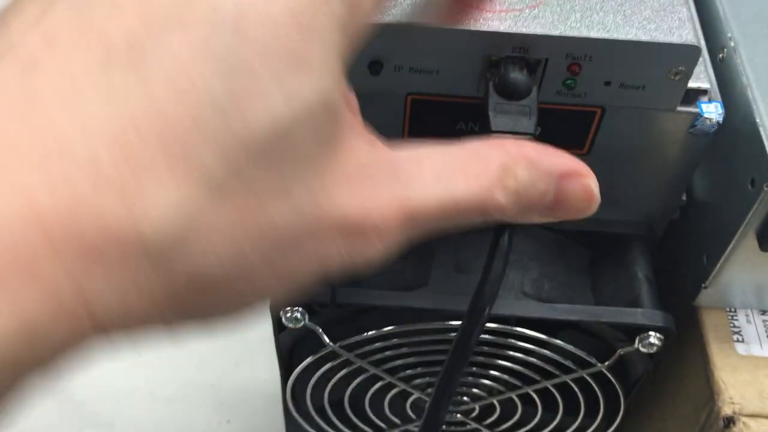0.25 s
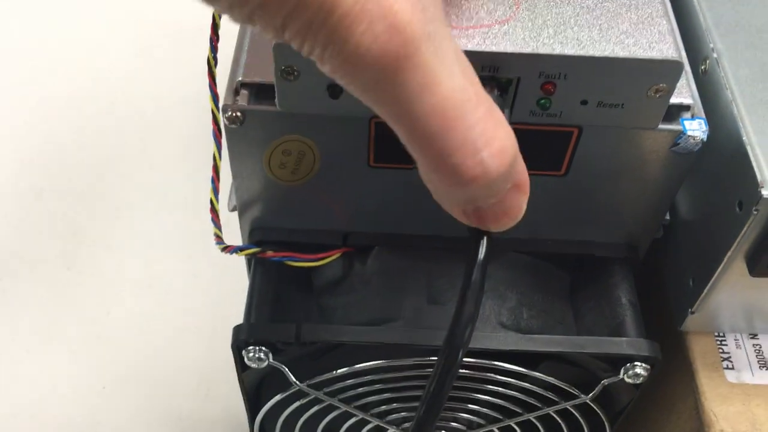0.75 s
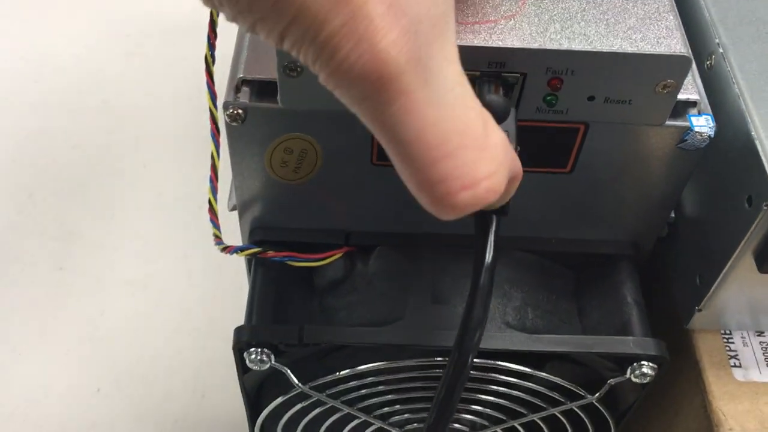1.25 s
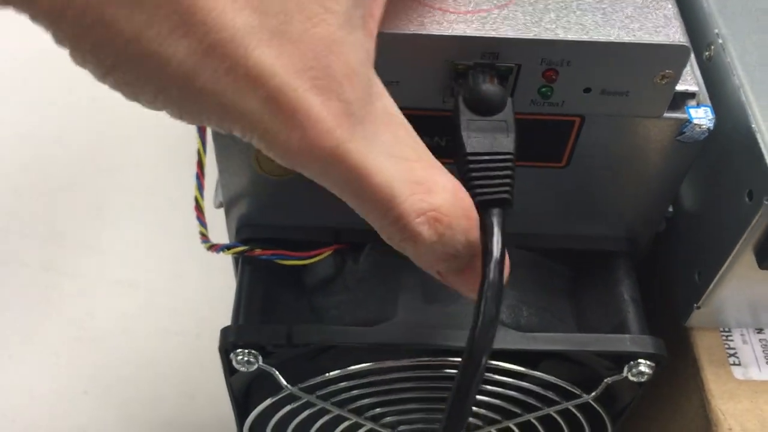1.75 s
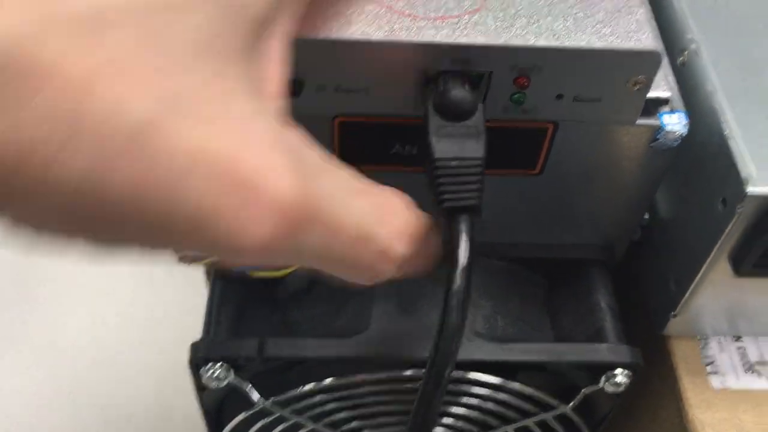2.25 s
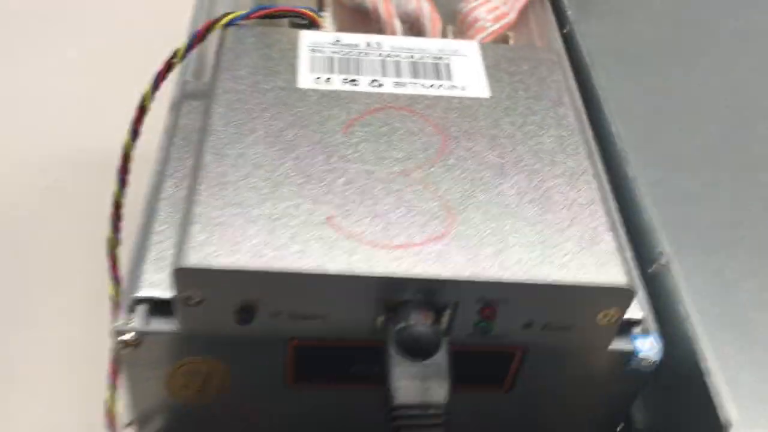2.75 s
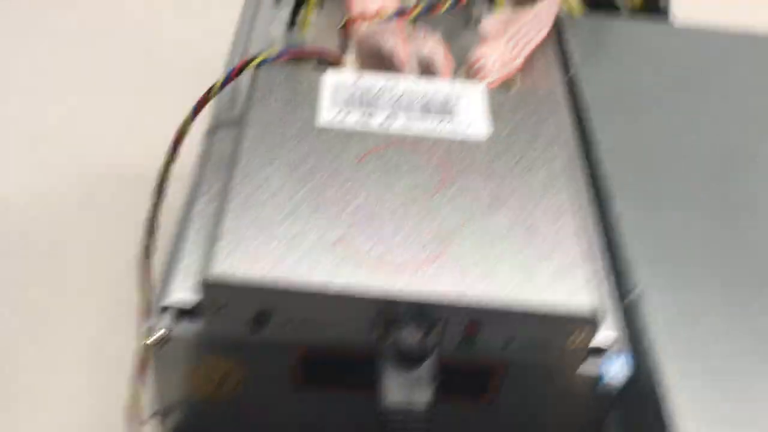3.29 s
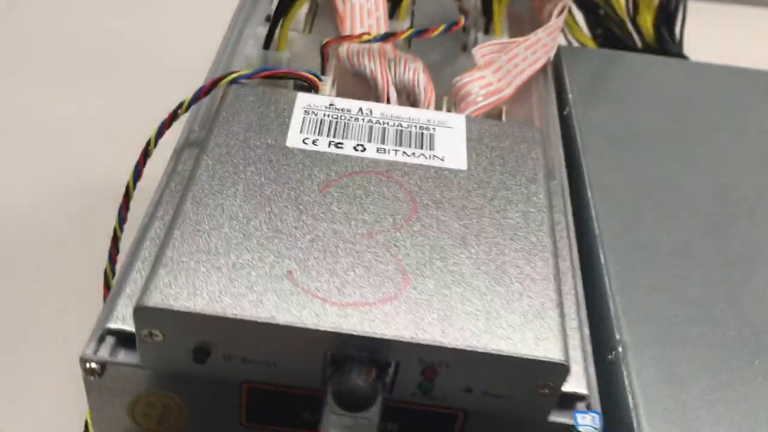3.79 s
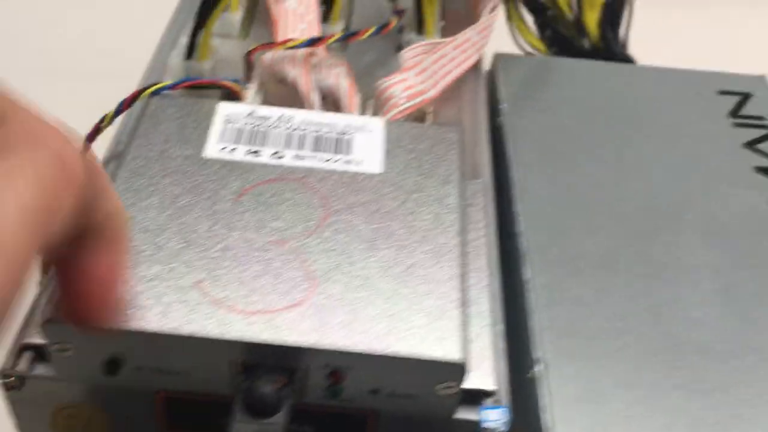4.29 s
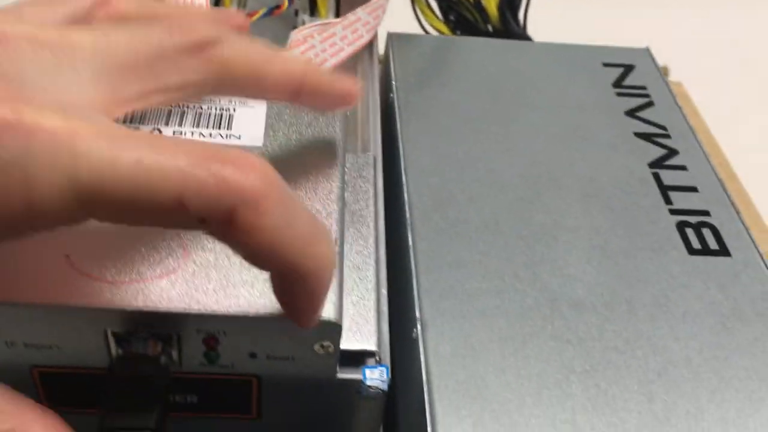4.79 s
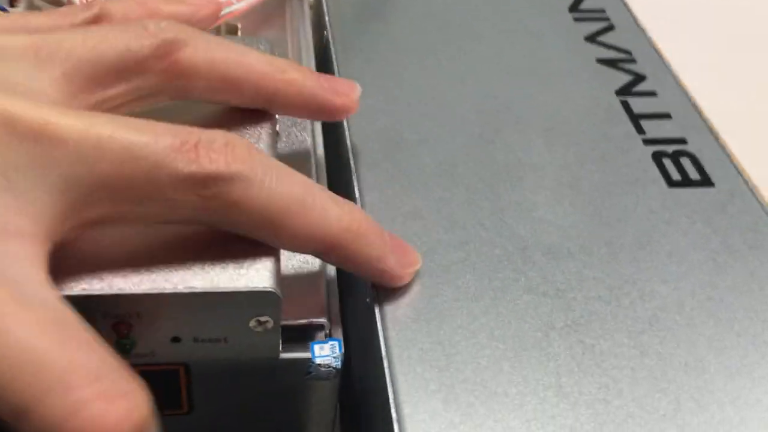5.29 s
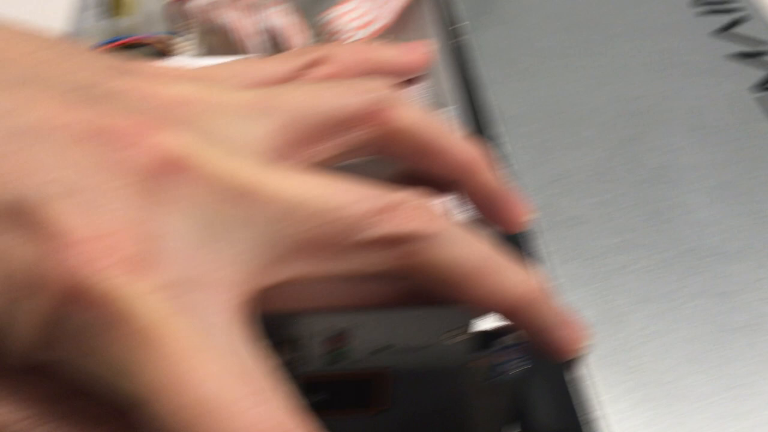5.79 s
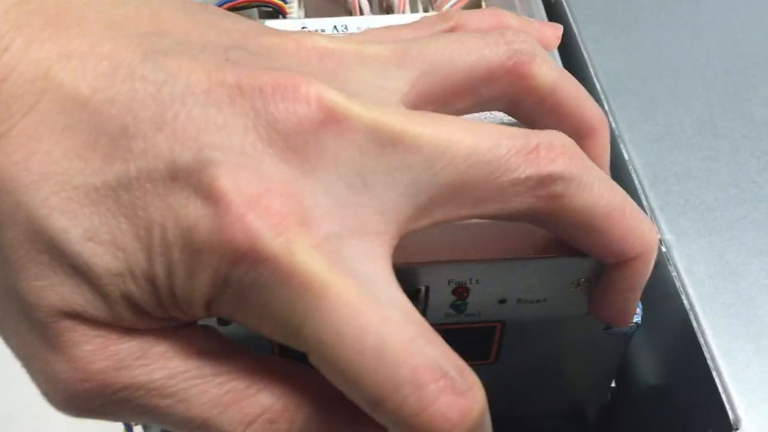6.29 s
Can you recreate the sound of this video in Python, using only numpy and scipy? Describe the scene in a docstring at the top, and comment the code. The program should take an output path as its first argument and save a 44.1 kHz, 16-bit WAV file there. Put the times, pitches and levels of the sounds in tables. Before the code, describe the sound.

A hand fumbles at a small metal device, with faint pads and grainy skin scrapes, then a loud crisp latch snap as a cable plug seats. A few softer knocks follow, then a quiet stretch with soft sleeve rustle. Later a flurry of hard metallic taps bursts out, then one final sharp nail-like crack. Close handheld microphone in a small room, short reverberation, faint low machinery hum and light hiss.

```python
"""A small room in a building: a hand pushes a network plug into the port of a small metal casing. It also taps,
grips and rubs the casing. Latch, finger pads, thumbs, knuckles, a flicked cable and nails make short noise
cracks that set the casing ringing. Skin and cable scrape as grainy noise played through the casing; a sleeve
rustles as soft noise. The room answers with fading noise over a low machinery hum of noise and wavering tones.
Dull bumps reach the phone through the hand, and its microphone adds hiss."""
import sys
import numpy as np
from scipy import signal
from scipy.fft import rfft, irfft, next_fast_len
from scipy.io import wavfile
from scipy.ndimage import uniform_filter1d, map_coordinates

SR = 44100
rng = np.random.default_rng(int(sys.argv[2]) if len(sys.argv) > 2 else 0)


def dump_mix(stems):
    """Bounce the given channels to the path in sys.argv[1] as a 16-bit WAV at rate SR."""
    frames = np.atleast_2d(stems).T  # one column per channel
    limited = np.clip(frames, -1, 1)  # hard clip at full scale
    pcm = np.round(limited * 32767).astype(np.int16)
    wavfile.write(sys.argv[1], SR, pcm)


N = 288414  # length in samples

# Touches on the casing, one table for each kind of striker (KNOCKS holds knuckle knocks and, at 1.956 s, a
# cable # flicking against the casing): start_s, peak_db (of the direct sound), knock_hz, # extra_knock_db,
# brightness_db_per_octave, casing_ring_db, room_db
LATCH = [(1.324, -3.5, 938.7, 1, -0.24, 3.5, -14)]
PADS = [(.185, -44.5, 1080, -3, 2.5, 9.9, -9), (.263, -40.5, 686, -8, 1.5, 7.4, -3),
        (.336, -32.5, 1180, 2, -1.2, 2.7, -14), (.447, -26, 1250, 4, .9, 5.4, -7),
        (.69, -54, 1060, 5, -.3, 7.3, 13), (.739, -36, 770, -3, -1.7, 12, -11),
        (.869, -41.5, 720, 8, -7, .3, -9), (1.015, -35.5, 735, -9.5, -8, 7, 3),
        (1.13, -45, 720, 2, -3.5, 2.8, -22), (1.618, -41.5, 926, -2.5, 1, 6, -4),
        (4.644, -39.5, 1150, -8, -0.7, 10, 7), (4.821, -28.5, 1080, 2, 0, 17, -21),
        (4.837, -34.5, 1070, -3, 0, 8, -4), (4.899, -20.5, 1030, 8.5, 1.4, 3.8, -8.5)]
THUMBS = [(1.859, -40, 890, 3, -.6, 4, -7), (2.143, -31, 990, -4, .6, 1.5, -7),
          (3.426, -39, 930, -3, -0.22, .3, -4.5), (5.2, -33, 1100, 1.5, 0.8, 4.4, -9)]
KNOCKS = [(.392, -41, 1180, 5, 0.1, 11, -12), (.478, -31, 1230, 9, -2.5, -9, -15),
          (.565, -42, 1090, 8, .3, -9, 0), (.785, -47, 1020, 6, -1.7, 1.5, 1),
          (1.956, -14, 980, 0.5, -0.7, 7.5, -10.5), (2.303, -34.5, 1010, -7, -2.5, 1.5, -8),
          (4.305, -41.5, 710, -2.5, -4.5, 5.5, 5), (4.611, -49, 1032, 3, -0.5, 8, -7),
          (4.679, -12.5, 1192, 7.5, 0.94, 8.5, -13.5), (4.874, -35, 1110, -5, -3.5, 9, 1),
          (4.925, -22.5, 1180, 14, 1, 8.5, -14), (4.943, -8, 1240, -16, 3, 5.5, -13.5)]
NAILS = [(.924, -50, 746, -1, -7.5, 0, .3), (2.082, -46, 780, 5, -1, -3, -17),
         (3.515, -46.5, 1100, 0, -5, 1, -7), (3.611, -47.5, 770, 1, -16.5, -13, -7),
         (3.781, -29, 1100, 6.8, 2, 8, -19), (5.291, -26, 1060, -4, -0.1, -8, -13),
         (6.037, -46.5, 1310, 1.5, -2, 3, -10.5), (6.255, -45, 1180, 1, 2, 6.5, -13),
         (6.325, -47, 1250, -1, -3.5, 12, -14), (6.345, -28, 1050, -5, -1.3, -1, -13),
         (6.371, -23, 1300, 4, -0.5, 4, -18), (6.387, -4, 1420, 7, 0.6, -1, -10.5)]
# The strikers: touches (a table above), colour_db (list: thud, knock, clack, snap, tick, hiss, sizzle),
# contact_ms (0.1 ms is added to it), hand_damping (times faster that the casing fades)
STRIKERS = [(LATCH, [2.5, -0.14, -6, 9, -3, 1.5, -0.3], 2.1, 1.3),
            (PADS, [9, 13, -4, -7, -10.5, -14.5, -11.5], 1.5, 1.4),
            (THUMBS, [16, 15, 6.5, 3.5, -5, -21, -26], 1.28, 1.03),
            (KNOCKS, [5.5, 6, 3.5, 0.5, 1, -2.5, -5], 1.399, 1.27),
            (NAILS, [-4, -12, -4.5, -5, -8.5, 4.5, 3.5], 0.99, 1.1)]
# Centres of a touch's thud, clack, snap, tick, hiss and sizzle: centre_hz
TOUCH_PARTS_HZ = [400, 2200, 3000, 4600, 9000, 14000]
# Ringing modes of the casing: pitch_hz, level_db (relative), t60_s (60 dB fade time before hand damping)
CASING_MODES = [(259, -1.5, 0.12), (375.3, 4.5, 0.18), (730, 5, 0.2), (774, -2, 1), (897, 0.5, 0.025),
                (1082, 4.5, 0.032), (1215, 5, 0.089), (1502, -2, 0.36), (1823, -5.5, 0.297),
                (2344, 7, 0.11), (2963, 6, 0.058), (3580, 3.5, 0.11), (4080, 1.5, 0.16), (4200, 3, 0.45),
                (4356, 2.5, 0.07), (4590, 0.5, .6), (5195, 1, 0.4), (5550, 5, 0.076), (6060, -0.5, .05),
                (6890, 4, .12), (7480, -2, 0.045), (8200, 0, 0.084), (8840, -1.5, 0.06),
                (10740, -0.5, 0.027), (12300, -6.5, 0.034), (13400, -4, 0.028), (15200, 3, 0.045)]
# Strokes of skin and cable: start_s, attack_s, hold_s, release_s, sizzle_db (before the casing),
# then levels relative to the sizzle: knock_db, scrape_db, squeak_db
STROKES = [(0.0, 0.033, .02, .02, -67, 4.5, -4, -21), (0.169, 0.025, .005, 0.05, -56.5, 4, -10, -7),
           (0.269, 0.028, 0.041, .01, -58, 1, -11, 15), (0.324, 0.019, 0.011, 0.024, -47.5, -9, -13, 5),
           (0.427, 0.018, 0.045, 0.011, -38, -2.5, -4, -1),
           (0.551, 0.019, 0.0027, 0.016, -48.5, -11, -3.5, -21),
           (0.583, 0.025, 0.045, .02, -74, 13.5, 4, -10), (0.668, 0.016, .1, 0.054, -60, 3.5, -6, 1),
           (0.838, 0.026, .01, 0.034, -62.5, 5, -5, -9), (1.004, 0.014, 0.006, .03, -63.5, 14, -0.5, -14),
           (1.102, 0.036, .003, 0.01, -79.5, 17.5, 5, -18), (1.284, 0.027, 0.013, .003, -66, 18, 2.5, -2.5),
           (1.568, 0.032, 0.041, .05, -52, -12, -10.5, -7), (2.282, 0.031, .015, .03, -48.5, 0.5, -3.5, 4),
           (4.294, 0.028, 0.033, .02, -46.5, -8, -7, 11), (4.349, .016, 0.0075, 0.024, -35, -14.5, -13, 18),
           (4.364, .018, 0.0072, 0.039, -44.5, -6, 1.5, -6), (4.61, 0.058, 0.016, .003, -56, -6, -2, -14.5),
           (4.696, .005, .01, 0.033, -60.5, 19.5, 0, -11), (4.727, .023, 0.0038, .025, -46.5, 4.5, -2, -1),
           (4.805, 0.017, .003, 0.052, -44, -12, -9, -1), (5.003, 0.037, 0.11, .003, -59, -3.5, -2.5, 1.5),
           (5.271, 0.072, 0.16, 0.12, -55, -3.5, -7.5, 4), (5.521, 0.087, .012, 0.034, -48, -7.5, -5.5, -1),
           (5.63, 0.022, 0.049, 0.013, -66, -8, -2, -7.5), (5.916, 0.048, 0.051, .02, -68, 0.5, 1.5, -12),
           (6.017, 0.017, 0.0027, .03, -59.5, 5.5, 4.5, -16),
           (6.239, 0.0074, 0.0088, 0.022, -51, -5.5, -5, -26)]
# Centres of a stroke's knock, scrape, sizzle and squeak: centre_hz
STROKE_PARTS_HZ = [1150, 4000, 12300, 15300]
# Rustles of sleeve and arm, away from the casing: start_s, attack_s, hold_s, release_s, swish_db, air_db
RUSTLES = [(1.36, .05, 0.32, .015, -67, -63.5), (3.27, .04, .015, .04, -74, -64),
           (3.37, 0.042, 0.16, 0.027, -68.5, -67.5), (3.59, 0.017, 0.035, .09, -60, -62),
           (3.81, .11, .1, .1, -59, -63), (4.11, 0.027, 0.021, .02, -80, -68),
           (4.17, 0.028, 0.016, .025, -78, -61.5)]
# Colour of the cloth's broad swish: frequency_hz, relative_level_db (per Hz)
SWISH_COLOUR = [(300, -39.5), (600, -5), (1200, 0.5), (2300, -3), (4500, -8), (8000, -17.5), (16000, -30)]
# Colour of the cloth's high airy part: frequency_hz, relative_level_db (per Hz)
AIR_COLOUR = [(3000, -30.5), (6000, -11.5), (9500, -6), (12000, -0.5), (16000, -1.5)]
# Dull bumps through the hand into the phone: centre_s, pitch_hz, level_db, length_s
BUMPS = [(0.665, 60.5, -45.5, 0.13), (1.088, 63.4, -38, 0.076), (3.581, 58.2, -48, 0.13),
         (3.957, 103.5, -43.5, 0.18), (4.022, 113.8, -49, 0.14), (4.897, 59.6, -46.5, 0.11),
         (5.453, 126.5, -42, 0.054)]
# How fast the room fades: frequency_hz, t60_s (60 dB fade time of the nearer tail)
ROOM_FADE = [(300, 0.55), (1000, 0.35), (4000, .26), (8000, 0.24), (14000, 0.12)]
# Slow level changes of the machinery noise: time_s, level_db
HUM_LEVEL = [(0.0, 0.5), (2.3, -0.5), (2.8, -2), (4.0, 0.5), (5.3, 1), (6.54, -2)]
# Colour of the machinery's rumble: frequency_hz, relative_level_db (per Hz)
RUMBLE_COLOUR = [(15, -50.5), (28, -24.5), (40, -3), (60, -1.5), (80, -2.5), (95, -10.5), (120, -49)]
# Colour of the machinery's drone: frequency_hz, relative_level_db (per Hz)
DRONE_COLOUR = [(70, -52.5), (95, -8), (122, 6), (140, 3.5), (165, -3), (190, -14), (250, -48)]
# Colour of the rushing air: frequency_hz, relative_level_db (per Hz)
RUSH_COLOUR = [(94, -52), (160, -12.5), (212, -4.5), (299, -11), (318, -13.5), (364, -14), (465, -22),
               (501, -20), (689, -25.5), (859, -26.5), (1210, -29), (1400, -34), (3000, -39.5), (3900, -65),
               (6600, -120)]
# Motor and mains tones: pitch_hz, relative_level_db
TONES = [(43, -60), (60, -54.5), (120, -56)]
# Colour of the microphone hiss: frequency_hz, relative_level_db (per Hz)
HISS_COLOUR = [(1200, -41.5), (2500, -3.5), (3800, 2), (4900, -11.5), (6200, -3), (8000, -18),
               (10300, -18.5), (11500, -4.5), (13500, 0.5), (16000, -1)]

SWELL_DB = 24.5  # a stroke or rustle starts and ends this far under its hold
RUMBLE_DB, DRONE_DB, RUSH_DB, HISS_DB = -54.5, -51.5, -54, -75
TOP_HZ = 15850  # middle of the 300 Hz wide slope at the top of the band


def contacts():
    """Each touch is a short rough crack coloured by what strikes; casing and room ring on."""
    size = 2 ** 14
    out = np.zeros(N + size)
    t = np.arange(size) / SR
    hz = np.fft.rfftfreq(size, 1 / SR)
    for touches, colour_db, contact_ms, damping in STRIKERS:
        contact_s = contact_ms * 1e-3 + 1e-4
        blow = np.exp(-2 * t / contact_s)
        rattle = 0.11 * np.exp(-0.5 * t / contact_s)
        shape = t / contact_s * (blow + rattle)
        # a delay, so the modes start about when the force peaks
        struck = np.exp(-2j * np.pi * hz * contact_s * 0.6)
        modes = casing(hz, damping)
        for start_s, peak_db, knock_hz, knock_db, bright_db, ring_db, room_db in touches:
            crack = shape * rng.standard_normal(size)
            crack = rfft(crack / np.linalg.norm(crack))
            points = list(zip(np.insert(TOUCH_PARTS_HZ, 1, knock_hz), colour_db))
            # the struck spot favours one pitch
            distance = np.log((hz + 1) / knock_hz) / 0.14
            focus_db = (6.5 + knock_db) * np.exp(-distance ** 2)
            tilt_db = bright_db * np.log2(np.clip(hz, 300, 16000) / 2000)
            low_cut = 1 / (1 + (200 / (hz + 1)) ** 4)
            colour = causal(amp(along(points, hz) + focus_db + tilt_db) * low_cut)
            ring = amp(ring_db) * struck * (strengths(scatter_db=2.5) @ modes)
            near = irfft(colour * (crack + ring))
            # the casing's near ring carries less into the room
            far = irfft(colour * (struck + 0.29 * ring))
            heard = near + amp(room_db) * room(far, delay_s=0.0035)
            out[round(start_s * SR):][:size] += amp(peak_db) / np.abs(near).max() * heard
    return out[:N]


def strokes():
    """Skin and cable stick and slip: grainy noise in four overlapping ranges, played through the casing."""
    rows = []
    for *times, sizzle_db, knock_db, scrape_db, squeak_db in STROKES:
        rows.append((*times, sizzle_db + knock_db, sizzle_db + scrape_db, sizzle_db, sizzle_db + squeak_db))
    grain = amp(1.0 * wobble(60) + 3.3 * wobble(300) + 2.5 * wobble(1500))
    rubbing = np.zeros(N)
    for level, share in zip(swells(rows), np.eye(4)):
        # each range peaks at its own centre and fades to nothing at its neighbours'
        band = [(680, 0.0023)] + list(zip(STROKE_PARTS_HZ, share))
        noise = filtered(grain * rng.standard_normal(N), lambda hz: along(band, hz) ** 1.5)
        rubbing += level * unit(noise)
    modes = casing(np.fft.rfftfreq(2 ** 14, 1 / SR), damping=2.7)
    ring = irfft(strengths(scatter_db=1.9) @ modes)
    rung = amp(-8.5) * rubbing + amp(-0.7) * signal.oaconvolve(rubbing, ring)[:N]
    return rung + amp(-18.5) * room(rung, delay_s=0.004)


def casing(hz, damping):
    """The casing rings at its own modes; damping by the hand makes each one wider and shorter (one row a mode)."""
    centre, db, t60 = np.transpose(CASING_MODES)[:, :, None]
    width = damping * np.log(1000) / (np.pi * t60)
    sign = (-1) ** np.arange(len(CASING_MODES))[:, None]
    return sign * amp(db) * 1j * hz * width / (centre ** 2 - hz ** 2 + 1j * hz * width)


def strengths(scatter_db):
    """Each touch wakes the modes unevenly: a new random gain for each mode."""
    return amp(scatter_db * rng.standard_normal(len(CASING_MODES))) + 0j


def rustles():
    """Cloth brushes softly: a broad swish and a high airy hiss."""
    swish, air = swells(RUSTLES)
    return swish * rush(SWISH_COLOUR, patchy_db=2.5) + air * rush(AIR_COLOUR, patchy_db=2.5)


def bumps():
    """Dull bumps through the hand into the phone: low tones that swell and fade."""
    out = np.zeros(N)
    t = np.arange(-SR // 4, SR // 4) / SR
    for centre_s, hz, db, length_s in BUMPS:
        swell = np.exp(-(2 * t / length_s) ** 2)
        out[round(centre_s * SR) - SR // 4:][:len(t)] += amp(db) * swell * np.sin(2 * np.pi * hz * t)
    return out


def room(x, delay_s):
    """A new diffuse answer of the room: each frequency dies at its own speed, over a weaker, slower tail from afar."""
    hz = np.fft.rfftfreq(256, 1 / SR)
    t = np.arange(138) * 128 / SR
    fall_db = -60 * t / along(ROOM_FADE, hz)[:, None]
    noise = rng.standard_normal(fall_db.shape) + 1j * rng.standard_normal(fall_db.shape)
    gain = amp(fall_db) + amp(-14.5 + 0.55 * fall_db)
    tail = signal.istft(noise * gain, SR, nperseg=256)[1]
    delayed = np.pad(x, (int(delay_s * SR), 0))
    return signal.fftconvolve(delayed, tail / np.linalg.norm(tail))[:len(x)]


def hum():
    """Building machinery: a rumble, a drone and rushing air around wavering tones."""
    level_db, = curves(HUM_LEVEL)
    noise = amp(RUMBLE_DB) * rush(RUMBLE_COLOUR, patchy_db=4.0)
    noise += amp(DRONE_DB) * rush(DRONE_COLOUR, patchy_db=0.37)
    noise += amp(RUSH_DB) * rush(RUSH_COLOUR, patchy_db=0.24)
    t = np.arange(N) / SR
    tones = np.zeros(N)
    for hz, db in TONES:
        level = amp(db + 2 + 0.79 * wobble(4))
        tones += level * np.sin(2 * np.pi * hz * t + 1.2 * wobble(11))
    return amp(level_db) * noise + tones


def amp(db):
    """Gain of a level in dB."""
    return 10 ** (np.asarray(db) / 20)


def unit(x):
    """x scaled to an rms (average strength) of 1."""
    return x / np.sqrt(np.mean(x ** 2) + 1e-20)


def along(points, hz):
    """Values read between (Hz, value) points on a log frequency axis."""
    f, v = np.transpose(points)
    return np.interp(np.log(hz + 1), np.log(f + 1), v)


def curves(rows):
    """One value per sample for each column after the time."""
    s, *cols = np.transpose(rows)
    return np.array([np.interp(np.arange(N) / SR, s, c) for c in cols])


def swells(rows):
    """Attack, hold and release of every row, as one gain curve for each level column."""
    t = np.arange(N) / SR
    level = np.zeros((len(rows[0]) - 4, N))
    for start_s, attack, hold, release, *db in rows:
        corners = start_s + np.cumsum([0, attack, hold, release])
        span = slice(round(start_s * SR), round(corners[-1] * SR))
        swell = np.interp(t[span], corners, [0, 1, 1, 0])
        level[:, span] += amp(db)[:, None] * amp(SWELL_DB * (swell - 1))
    return level


def wobble(rate):
    """A smooth random curve through rate random points a second."""
    step = max(1, int(SR / rate / 16))
    at = np.arange(0, N + step, step)
    knots = rng.standard_normal(int(N * rate / SR) + 4)
    return np.interp(np.arange(N), at, map_coordinates(knots, [at * rate / SR]))


def filtered(x, response):
    """x with each frequency scaled by response(hz)."""
    m = next_fast_len(x.shape[-1] + SR // 2)
    return irfft(rfft(x, m) * response(np.fft.rfftfreq(m, 1 / SR)), m)[..., :x.shape[-1]]


def causal(gain):
    """The minimum-phase response of a gain: its sound comes as early as it can."""
    c = irfft(np.log(gain + 1e-6))
    c[1:len(c) // 2] *= 2
    c[len(c) // 2 + 1:] = 0
    return np.exp(rfft(c))


def rush(spectrum, patchy_db):
    """Coloured noise of rms 1, with random louder and softer patches in time and frequency."""
    z = rng.standard_normal((257, N // 256 + 2, 2)) @ [1, 1j]
    field = uniform_filter1d(rng.standard_normal(z.shape), size=6, axis=0)
    field = uniform_filter1d(field, size=12, axis=1)
    noise = signal.istft(z * amp(patchy_db * unit(field)), nperseg=512)[1][:N]
    return unit(filtered(noise, lambda hz: amp(along(spectrum, hz))))


def scene():
    """All sources at the one microphone."""
    return (contacts() + strokes() + rustles() + bumps() + hum())[None]


def record(dry):
    """The microphone adds hiss, and the sound fades out over the slope around TOP_HZ."""
    hiss = amp(HISS_DB) * rush(HISS_COLOUR, patchy_db=1.1)
    return filtered(dry + hiss, lambda hz: np.clip((TOP_HZ + 150 - hz) / 300, 0, 1) ** 2)


dry = scene()
out = record(dry)
dump_mix(out)
```